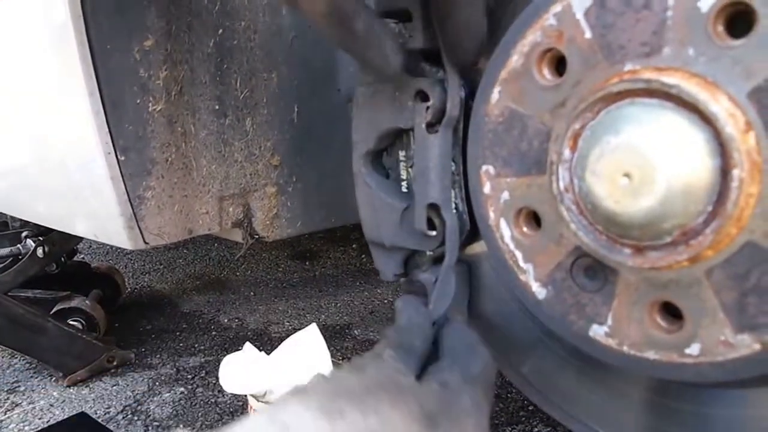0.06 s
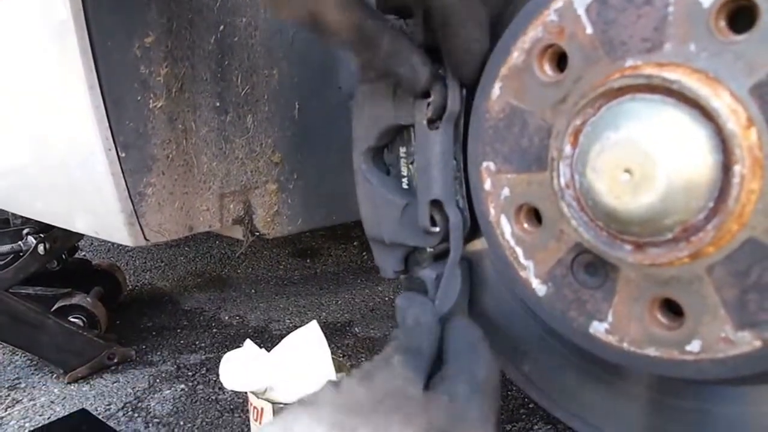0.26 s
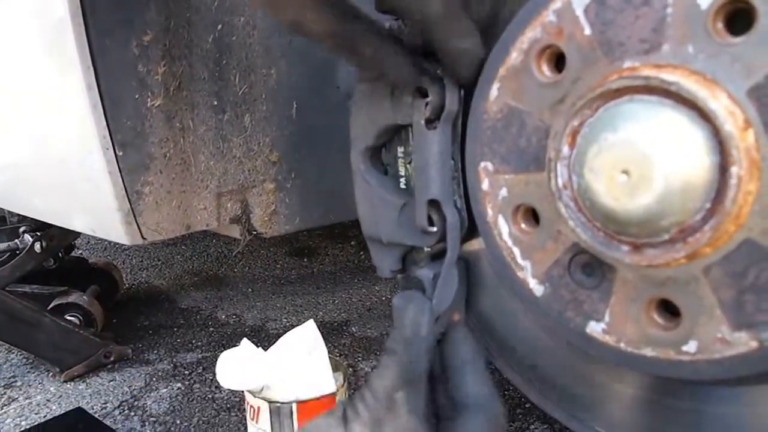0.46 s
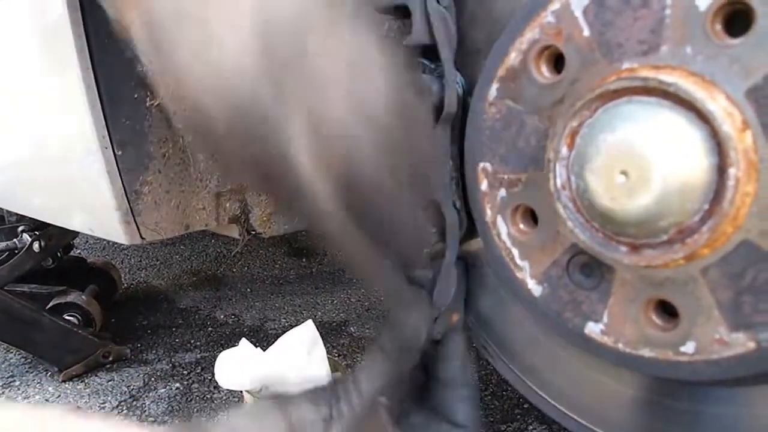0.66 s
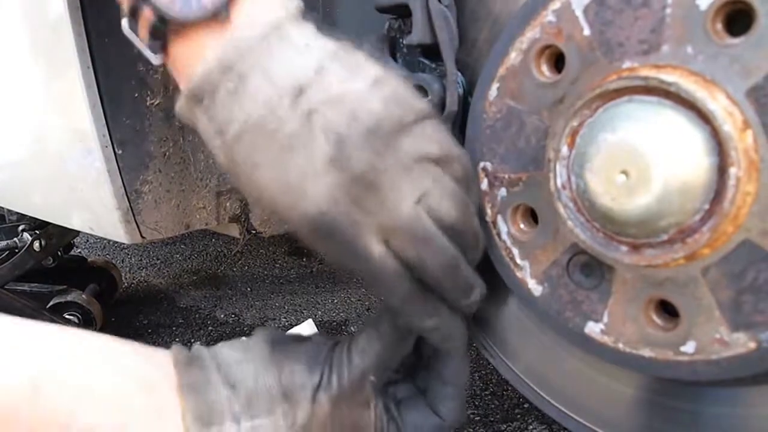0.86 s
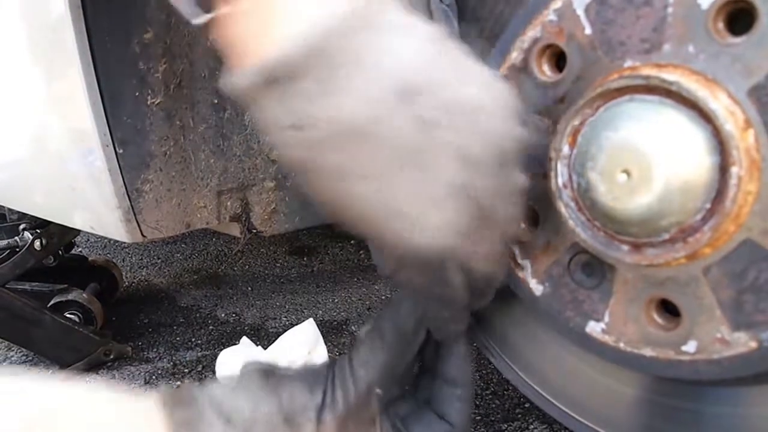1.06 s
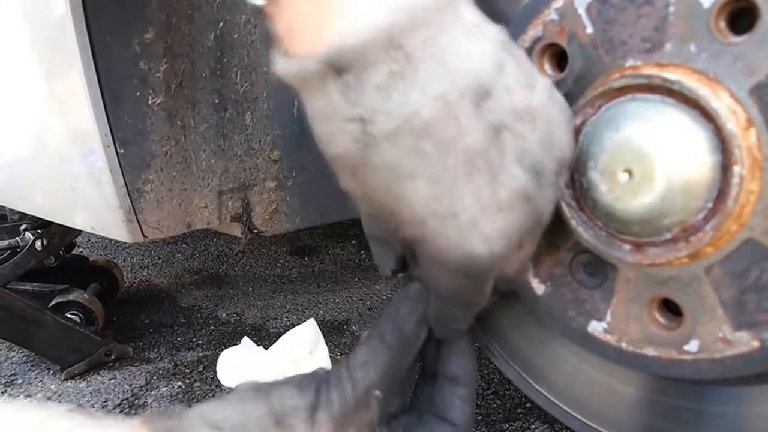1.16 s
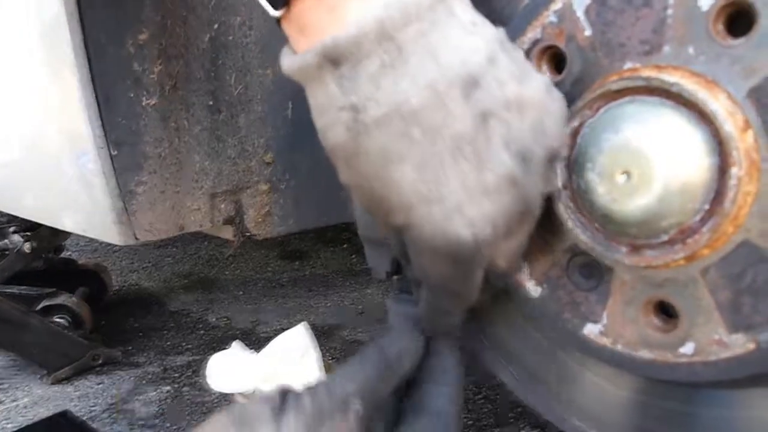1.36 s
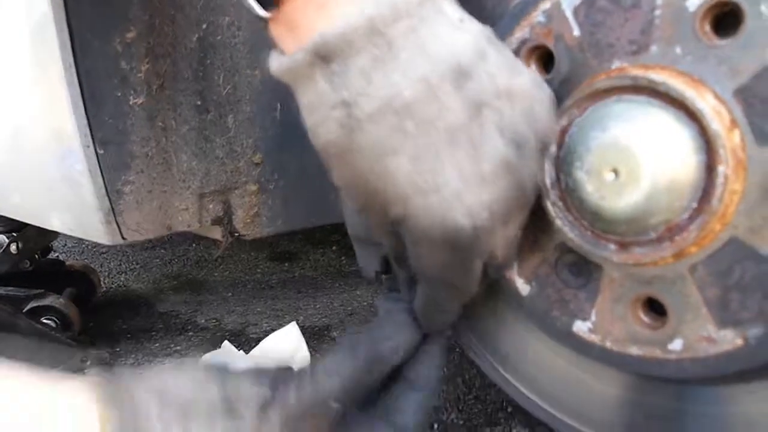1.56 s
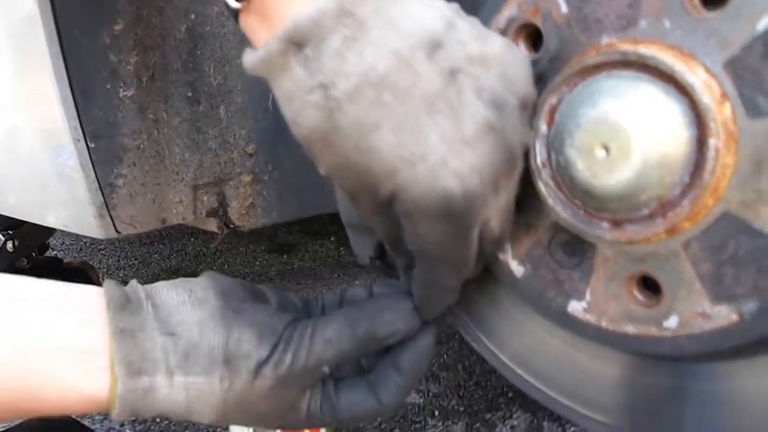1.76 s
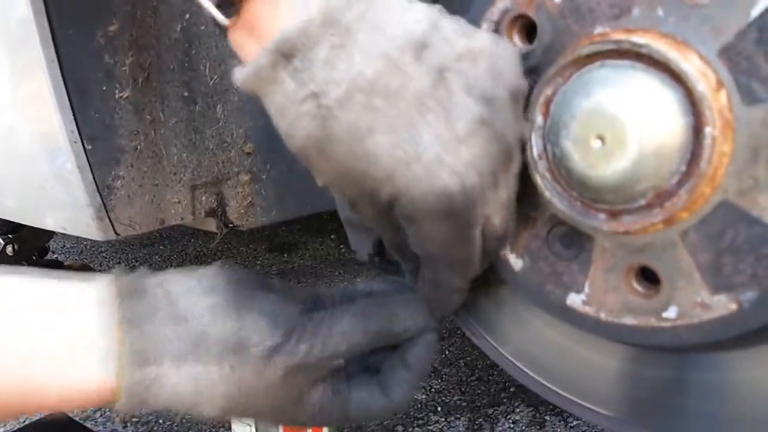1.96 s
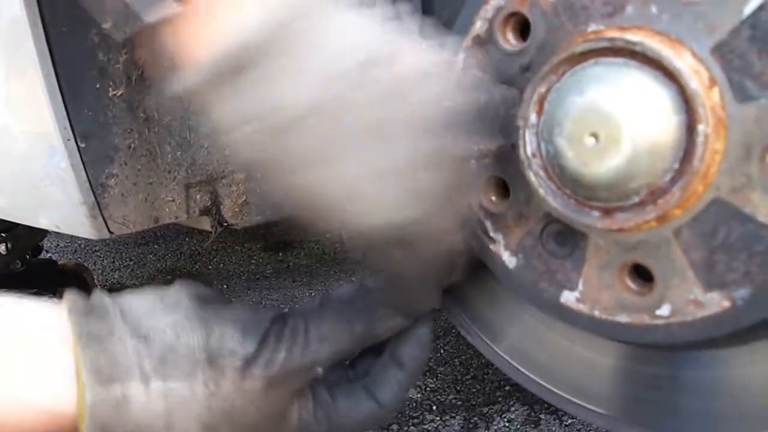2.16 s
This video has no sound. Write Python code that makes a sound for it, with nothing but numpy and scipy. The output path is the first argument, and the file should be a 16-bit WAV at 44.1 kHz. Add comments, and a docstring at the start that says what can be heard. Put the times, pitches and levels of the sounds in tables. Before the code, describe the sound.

Metal brake parts snap, click and clank by hand outdoors over faint traffic and hiss

```python
"""Distant traffic and microphone hiss are heard first; then gloved hands fit brake parts beside a car.
A steel clip snaps home, parts knock on the caliper and the iron disc rings on: damped modes, loose
clatter and a contact tick. Small parts click as short partials with grit; gloves rub and parts scrape
as grainy band noise; the rocking car thuds as a falling low sine. Traffic and hiss are shaped noise."""
import sys
import numpy as np
from scipy import signal
from scipy.io import wavfile
from scipy.ndimage import uniform_filter1d

SR = 44100
rng = np.random.default_rng(int(sys.argv[2]) if len(sys.argv) > 2 else 0)


def store_pcm(level_fs):
    """Save levels as 16-bit WAV."""
    pcm = np.round(np.clip(level_fs, -1, 1) * 32767).astype(np.int16)
    wavfile.write(sys.argv[1], SR, np.atleast_2d(pcm).T)


def elevation(decibels):
    """Turn decibel levels (scalar or array-like) into linear amplitude ratios."""
    levels = np.asarray(decibels, float)
    return 10 ** (levels / 20)


N = 97020  # samples, 2.2 s


def evened(x):
    """Normalisation: scales a signal to an rms of 1."""
    return x / np.sqrt(np.mean(x ** 2) + 1e-20)


def read(points, hz):
    """Logarithmic pitch axis: interpolates a table of (f/Hz, value) along log frequency."""
    f, value = np.transpose(points)
    return np.interp(np.log(hz + 1), np.log(f + 1), value)


def add(mix, s, sound):
    """Superposition: sums a sound into the mix from time s on."""
    part = mix[round(s * SR):][:len(sound)]
    part += sound[:len(part)]


def noise(count, size, shape):
    """Filtered Gaussian noise: random short-time spectra weighted by shape(hz, t)."""
    hop = size // 4
    hz = np.fft.rfftfreq(size, 1 / SR)[:, None]
    t = np.arange(count // hop + 5) * hop / SR
    real, imag = rng.standard_normal((len(t), len(hz), 2)).T
    spectra = (real + 1j * imag) * shape(hz, t)
    return signal.istft(spectra, nperseg=size, noverlap=size - hop)[1][:count]


def smooth_field(frames, bins, frame_span, bin_span):
    """Correlated fluctuation: a random field of rms 1, averaged over frames and bins."""
    field = rng.standard_normal((frames, bins))
    field = uniform_filter1d(field, frame_span, axis=0)
    field = uniform_filter1d(field, bin_span, axis=1)
    return evened(field).T


# spectrum of traffic and hiss: (f/Hz, relative density level/dB per Hz)
AIR_SPECTRUM = [(15, -49), (30, 1.5), (110, -4.5), (250, -7), (450, -13), (1100, -16.5), (1500, -22),
                (3000, -30), (5500, -38.5), (8500, -35.5), (12000, -34), (15700, -32.5), (15900, -68)]


def air():
    """Stationary noise with modulation: traffic and hiss, whose level wavers most in the bass."""
    level_db, lump_db = -39.5, 2.0
    lumps = smooth_field(N // 256 + 5, 513, 8, 6)

    def shape(hz, t):
        return elevation(read(AIR_SPECTRUM, hz) + lump_db * lumps / (1 + hz / 1500))

    return elevation(level_db) * evened(noise(N, 1024, shape))


# the car rocks: (t/s, length/s, level/dB before the swell, starting f/Hz)
CAR_THUDS = [(.245, 0.2, -34.5, 150.2), (.41, .08, -39, 214.5), (1.076, 0.039, -43, 70),
             (1.449, 0.068, -39, 45), (1.639, 0.031, -34, 89), (1.772, 0.24, -32, 65)]


def thud(length, db, hz):
    """Low-frequency oscillation: a sine of falling pitch swells and fades."""
    t = np.arange(0, length, 1 / SR)
    swell = np.sin(np.pi * (t / length) ** 0.36)
    return elevation(db) * swell * np.sin(2 * np.pi * hz * t * (1 - 0.63 * t))


# glove rubs and scrapes:
# (t/s, length/s, rms level/dB before the stroke envelope, centre f/Hz, 1/e half-width/octaves)
GLOVE_RUBS = [(0.442, 0.018, -66, 2960, 2.2), (0.51, 0.049, -53.5, 2550, 1),
              (0.562, 0.046, -52.5, 3870, 1.05), (0.79, 0.032, -46.5, 2960, 1.1),
              (0.904, 0.025, -50.5, 2500, 1.7), (0.991, 0.046, -54.5, 2430, 0.99),
              (.9, 0.048, -43, 800, 0.58), (1.169, 0.12, -45, 587, 0.89), (1.186, 0.18, -52.5, 2320, 1.25),
              (1.338, 0.028, -51, 7100, 0.99), (1.369, 0.098, -51, 4540, 0.93),
              (1.427, 0.041, -32.5, 1460, 1.1), (1.449, 0.055, -41, 4700, 0.77),
              (1.446, 0.073, -33.5, 416, 1.2), (1.504, 0.032, -37.5, 1500, 1.1),
              (1.754, 0.056, -56, 3750, 1), (2.162, 0.11, -52.5, 3370, 1.1)]


def rub(length, db, hz, octaves):
    """Friction noise: grainy band noise under one stroke that bites fast and fades."""
    grain_db = 3.5  # rms of the level fluctuation
    t = np.arange(0, length, 1 / SR)

    def shape(f, u):
        return np.exp(-(np.log2(f / hz + 1e-3) / octaves) ** 2) + 0 * u

    hiss = noise(SR // 5, 256, shape)
    memory = np.exp(-np.arange(200) / 50)  # samples
    roughness = evened(np.convolve(rng.standard_normal(SR // 5), memory, "same"))
    stroke = np.sin(np.pi * (t / length) ** 0.4) ** 0.5
    return elevation(db) * evened(hiss * elevation(grain_db * roughness))[:len(t)] * stroke


# light ticks of a small part: (t/s, level/dB, ring f/Hz, t60/s, grit level over the ring/dB)
PART_TICKS = [(.223, -21, 1084, 0.066, 2), (.229, -9.5, 1062, 0.075, -10.5), (.398, -47, 6840, 0.0086, -26),
              (0.435, -56, 2870, 0.043, 9), (.477, -30.5, 772, 0.062, -17), (.787, -41.5, 2200, 0.012, 4),
              (0.787, -53, 5400, 0.015, 5), (.805, -54, 5860, 0.024, 6), (.915, -45, 2300, 0.079, -19),
              (1.4255, -12, 980, 0.0058, -11), (1.4249, -21, 1750, 0.037, -4.5),
              (1.425, -38, 5960, 0.046, -1), (1.4488, -35.5, 6460, 0.037, -2),
              (1.4485, -35.5, 3520, 0.0083, 10), (1.4673, -22, 900, 0.012, -12),
              (1.471, -46, 6100, 0.036, 1), (1.507, -38, 2230, 0.037, 3.5), (1.5054, -41, 6440, .02, -2),
              (1.5206, -40, 1980, 0.038, -2), (1.5212, -45.5, 4970, .02, 5), (1.587, -41, 5970, 0.052, -18),
              (1.6, -39.5, 2430, 0.22, -16), (1.801, -28.5, 2270, 0.025, -13),
              (1.8005, -38, 2940, 0.023, -14), (2.059, -49, 2370, 0.2, -3), (2.102, -33, 2450, 0.014, -1),
              (2.102, -36, 4690, 0.027, -9), (2.12, -44, 5000, 0.0096, 2), (2.126, -48.5, 6800, 0.023, 2)]


def tick(db, hz, t60, grit_db):
    """Damped resonance: a short partial, its phase varied at random, with grit around it."""
    grit_octaves, rise_s = 0.6, 0.00012  # half the grit's bandwidth; time constant
    t = np.arange(SR // 8) / SR
    ring = np.sin(2 * np.pi * hz * t)
    ring += 0.26 * np.sin(2 * np.pi * hz * t + 6 * rng.random())
    edges = [hz / 2 ** grit_octaves, hz * 2 ** grit_octaves]
    band = signal.butter(2, edges, "bandpass", fs=SR)
    grit = evened(signal.lfilter(*band, rng.standard_normal(len(t))))
    envelope = (1 - np.exp(-t / rise_s)) * elevation(db - 60 * t / t60)
    return envelope * (ring + elevation(grit_db) * grit)


# struck spots, in the order of the level columns below
STRUCK_SPOTS = ("clip", "pad", "bracket")
# modes of caliper and disc: (f/Hz)
MODE_HZ = [170, 215, 474, 538, 770, 967, 1056, 1080, 1174, 1390, 1495, 1658, 1782, 1943, 2046, 2126, 2234,
           2333, 2430, 2541, 2611, 2685, 2743, 2842, 3042, 3192, 3456, 3575, 3941, 4165, 4420, 4608, 4883,
           5992, 6223, 6430, 8300, 9570, 12740, 775, 1090]
# decay and strength of each mode: (t60/s, clip level/dB, pad level/dB, bracket level/dB)
MODE_DECAY_AND_LEVEL = [(0.45, -16, -33, -26.5), (0.74, -24.5, -23, -38), (0.19, -35, -12.5, -9),
                        (0.15, -17.5, -8, -0.5), (0.94, -24, -24, -23), (0.076, -11, 5.5, -6.5),
                        (0.73, -21, -28, -31), (0.56, -16, -18, -17), (0.84, -30, -40, -22),
                        (0.037, -19, -28, 2.5), (0.66, -37.5, -46, -38), (0.14, -11.5, -32, -19.5),
                        (0.6, -18.5, -30.5, -20.5), (0.29, -23.5, -26.5, -17.5), (0.18, -14, -27, -17),
                        (0.2, -19, -30, -35), (0.14, -14, -44, -42), (0.11, 2, -18, 3),
                        (0.24, -16, -17, -26), (0.22, -14, -61, -40), (0.093, -5, -26, -2.5),
                        (0.14, -8, -31, -26), (0.18, -15, -45, -12), (0.45, -32, -53, -34),
                        (0.032, -2, -8.5, 3), (0.15, -17, -20.5, -13.5), (0.03, -3.5, -6.5, 1.5),
                        (0.11, -14.5, -12, -3.5), (0.21, -30, -42, -37), (0.016, -8, -37, 5),
                        (0.027, -8, -32, 6), (0.17, -27, -46, -24), (0.056, -28, -35, -43),
                        (0.16, -41, -36, -27), (0.05, -10, -21, -11), (0.02, -5, -35, -26),
                        (0.014, 0, -40, -25), (0.05, -18, -34, -29), (0.038, -19, -40, -34),
                        (0.097, -11, -13, 0), (0.067, -10, -0.5, -2)]
# spectrum of many loose parts: (f/Hz, relative density level/dB per Hz)
CLATTER_SPECTRUM = [(88, -36), (150, -9), (767, -15), (1860, -16), (2310, -4), (2980, -16.5), (4330, -9),
                    (5700, -4.5), (8400, -11), (11000, -18.5), (13900, -19), (15300, -15), (16500, -49)]
# decay of the loose parts: (f/Hz, t60/s)
CLATTER_DECAY = [(200, 0.25), (700, 0.28), (2000, 0.14), (5000, 0.032), (9000, 0.025), (16000, 0.037)]
# strength of the clatter for each struck spot: (level/dB)
CLATTER_LEVEL = [-7.5, -15.5, -5]
# blows: (t/s, spot, level/dB, contact dulls above f/Hz, rise time constant/s)
PART_BLOWS = [(0.2213, "pad", -26, 6000, 0.0015), (.2285, "pad", -20.5, 6000, 0.00051),
              (.2345, "clip", -7.5, 14100, 0.00017), (0.2386, "clip", -15, 6770, .001),
              (0.2418, "clip", -23, 6000, 0.00049), (1.585, "pad", -18, 7300, 0.0024),
              (1.5951, "pad", -27.5, 2900, 0.00092), (1.601, "pad", -20, 2700, 0.0022),
              (1.9349, "bracket", -17, 13000, 0.00065), (1.938, "bracket", -19.5, 6900, 0.00055),
              (1.942, "bracket", -14.5, 5500, 0.0017), (1.9466, "bracket", -12, 900, .003)]


def modes(t, spot):
    """Modal superposition: the struck spot sets how strongly each damped mode rings."""
    table = np.array(MODE_DECAY_AND_LEVEL)
    hz = np.array(MODE_HZ)[:, None]
    t60, level_db = table[:, :1], table[:, 1 + spot:2 + spot]
    return (elevation(level_db - 60 * t / t60) * np.sin(2 * np.pi * hz * t)).sum(0)


def clatter(count):
    """Reverberant decay: patchy noise of loose parts fades at a rate set by frequency."""
    patchy_db = 4
    linger_db, linger_times = -16.5, 4.23  # the car body carries a fainter, slower share
    patches = smooth_field(count // 64 + 5, 129, 4, 5)

    def shape(hz, t):
        fall_db = -60 * t / read(CLATTER_DECAY, hz)
        decay = elevation(fall_db) + elevation(linger_db + fall_db / linger_times)
        return elevation(read(CLATTER_SPECTRUM, hz) + patchy_db * patches) * decay

    loose = noise(count, 256, shape)
    return loose / np.sqrt(np.mean(loose[:660] ** 2))  # rms 1 over the first 15 ms


def blow(spot, db, dull_hz, rise):
    """Impact excitation: contact tick, modes and clatter together; a soft contact loses treble."""
    t = np.arange(SR // 2) / SR
    k = STRUCK_SPOTS.index(spot)
    contact = elevation(-16 - 60 * t / 0.0042) * rng.standard_normal(len(t))  # dB, t60 4.2 ms
    sources = modes(t, k) + elevation(CLATTER_LEVEL[k]) * clatter(len(t)) + contact
    onset = 1 - np.exp(-t / rise)
    band = signal.butter(2, [130, dull_hz], "bandpass", fs=SR)
    return elevation(db) * signal.lfilter(*band, onset * sources)


def scene():
    """Linear superposition: all sources, close and dry in the open air."""
    mix = air()
    for maker, rows in ((thud, CAR_THUDS), (rub, GLOVE_RUBS), (tick, PART_TICKS), (blow, PART_BLOWS)):
        for s, *row in rows:
            add(mix, s, maker(*row))
    return mix[None]


def band_limit(x):
    """A steep low-pass at the top of the band."""
    return signal.sosfilt(signal.butter(12, 16700, fs=SR, output="sos"), x)


def record(dry):
    """Gain control by a held peak level ducks loud blows; a notch removes a narrow treble band."""
    knee_db, duck, recover_db_per_s = -16, 0.4, 22.0  # duck: dB lost per dB over the knee
    notch_hz, notch_width_hz = 7930, 300
    power = uniform_filter1d(dry[0] ** 2, size=400)
    power_db = 10 * np.log10(abs(power) + 1e-12)
    fall_db = np.arange(N) * recover_db_per_s / SR
    held_db = np.maximum.accumulate(power_db + fall_db) - fall_db
    over_db = np.maximum(held_db - knee_db, 0)
    ducked = dry * elevation(-duck * uniform_filter1d(over_db, size=200))
    band = signal.lfilter(*signal.iirpeak(notch_hz, notch_hz / notch_width_hz, SR), ducked)
    finished = np.clip(ducked - band, -1, 1)
    return band_limit(finished)


dry = scene()
out = record(dry)
store_pcm(out)
```